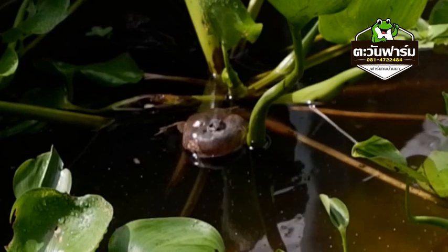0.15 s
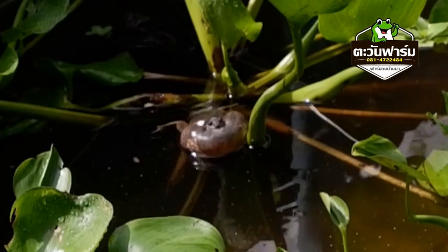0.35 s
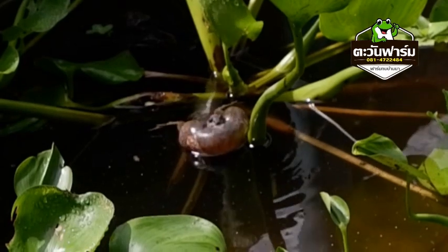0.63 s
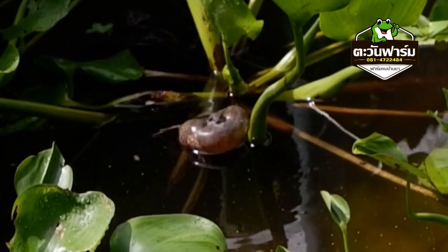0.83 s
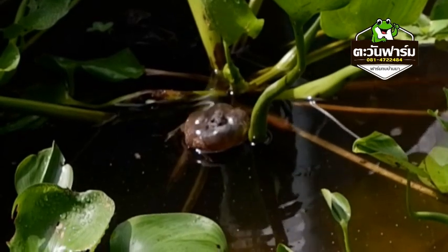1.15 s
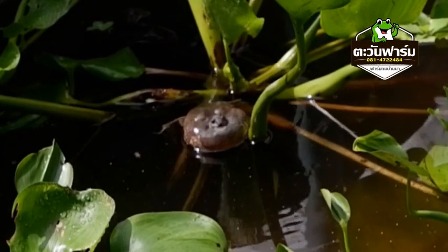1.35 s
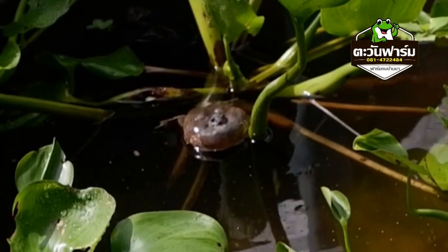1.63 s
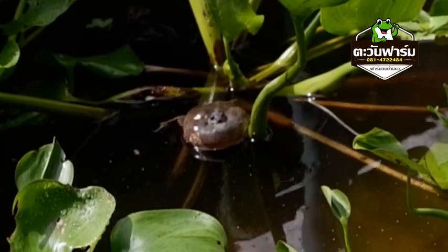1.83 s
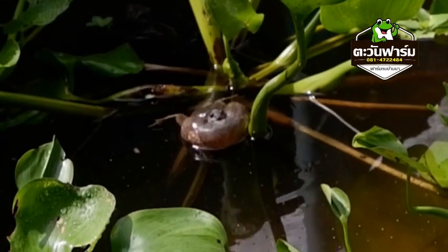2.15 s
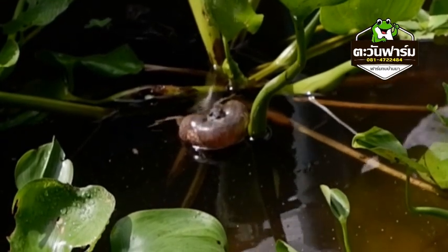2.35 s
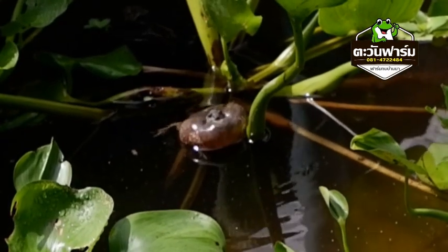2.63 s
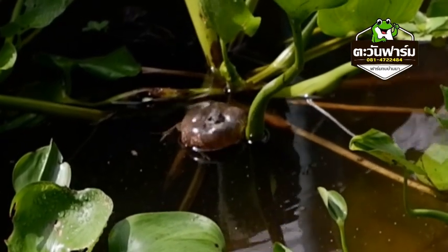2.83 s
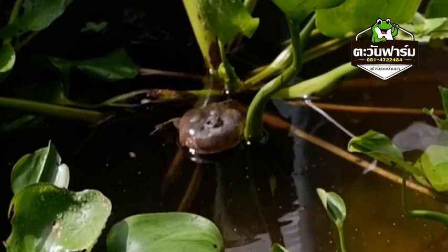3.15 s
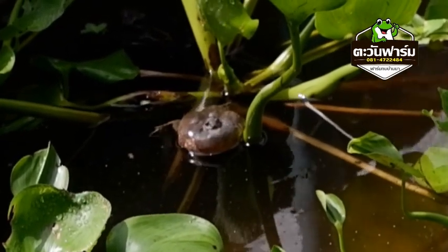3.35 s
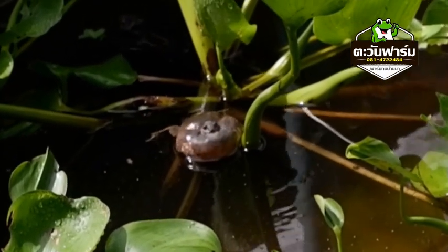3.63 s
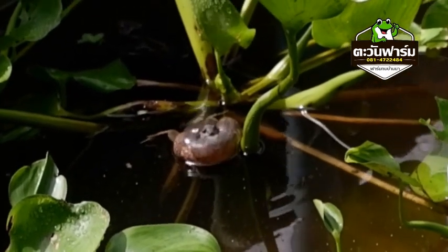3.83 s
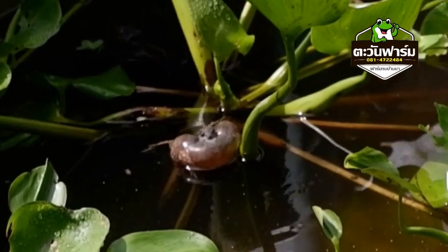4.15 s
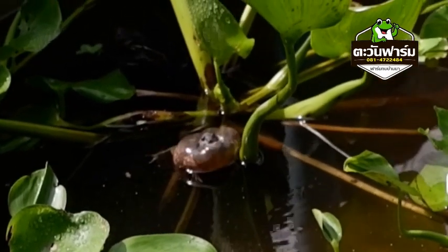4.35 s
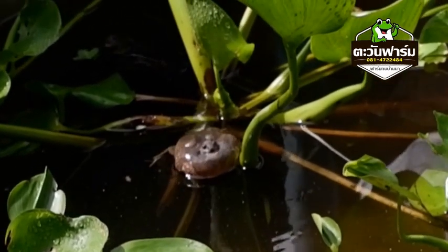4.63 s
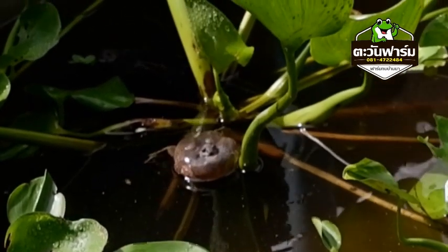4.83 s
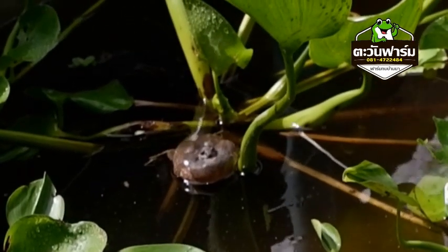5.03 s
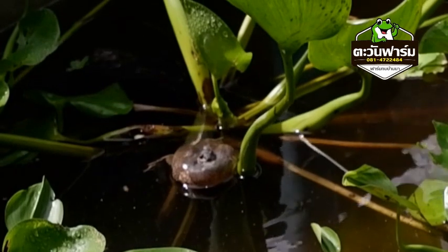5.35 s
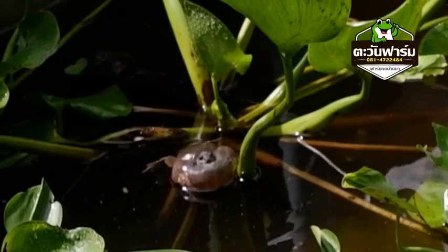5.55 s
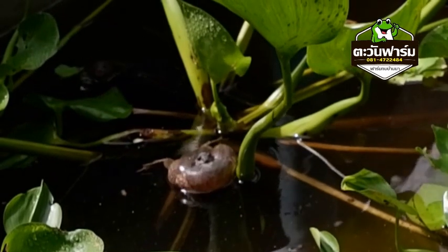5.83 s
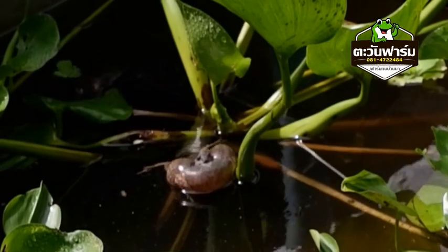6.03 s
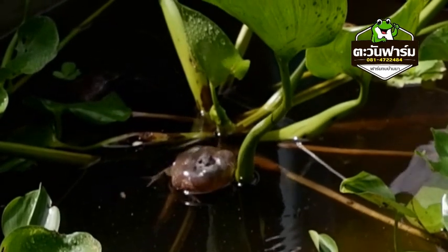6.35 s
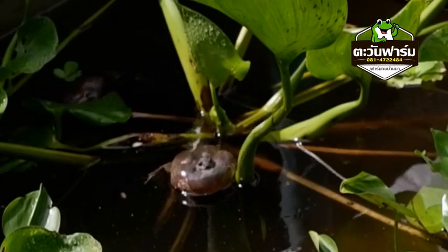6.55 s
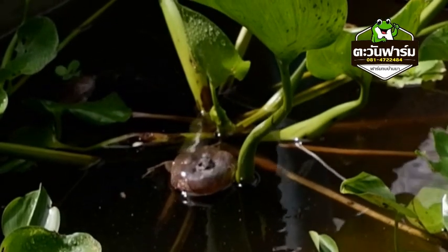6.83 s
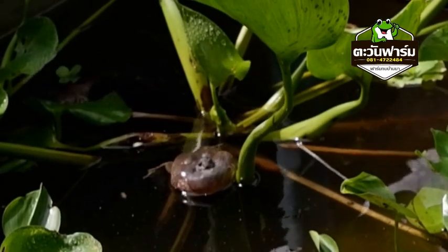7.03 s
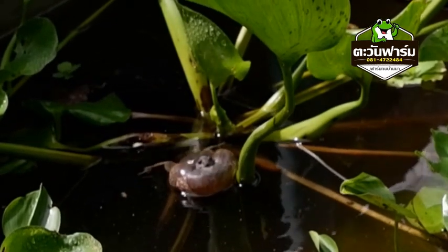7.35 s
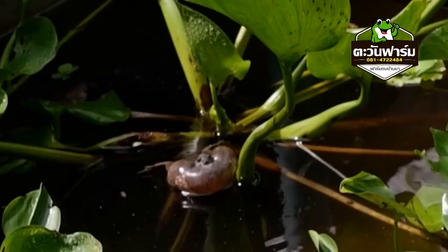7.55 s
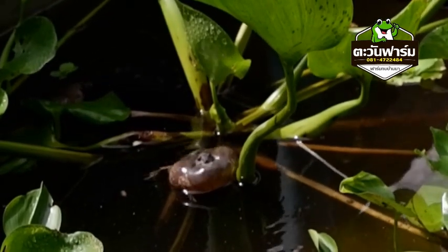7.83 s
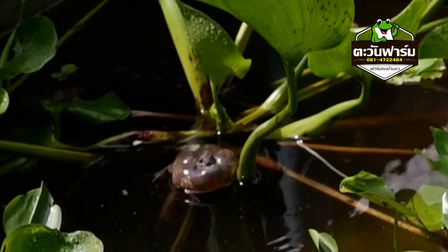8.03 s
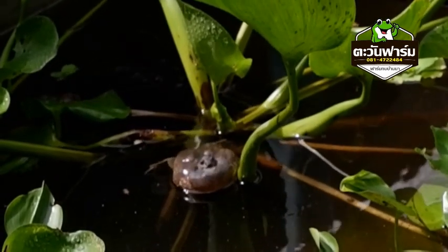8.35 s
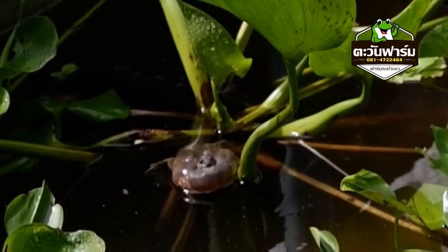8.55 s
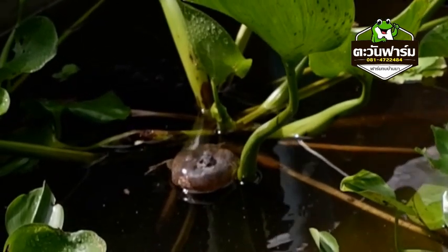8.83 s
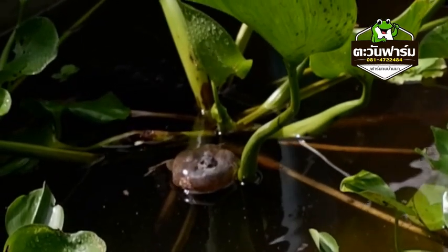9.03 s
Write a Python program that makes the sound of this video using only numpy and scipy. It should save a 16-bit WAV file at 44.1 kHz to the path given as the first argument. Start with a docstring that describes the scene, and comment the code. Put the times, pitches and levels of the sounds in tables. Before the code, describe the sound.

Close, buzzy frog calls repeat steadily over a faint rattling chorus of small frogs and softer answering croaks.

```python
"""Small frogs rattle all around a pond and a neighbour croaks from the left; then a burrowing frog,
floating close by, calls again and again, about 57 pulses a second ringing its swollen vocal sac.
Neighbours answer; a close rattle, thin squeaks, two plops and faint low rumbles fill the gaps.
A limiter ducks the chorus under the calls. Near the end the sound cuts out twice, then comes back
with a click and a low thump."""
import sys
import numpy as np
from scipy import signal
from scipy.fft import rfft, irfft, next_fast_len
from scipy.io import wavfile
from scipy.ndimage import uniform_filter1d, minimum_filter1d

SR = 44100
rng = np.random.default_rng(int(sys.argv[2]) if len(sys.argv) > 2 else 0)


def master_out(mix):
    """Clip the mix to full scale and print it as 16-bit PCM to the path in sys.argv[1]."""
    frames = np.transpose(np.atleast_2d(mix))
    ceiling = np.clip(frames, -1, 1)
    pcm = np.round(ceiling * 32767).astype(np.int16)
    wavfile.write(sys.argv[1], SR, pcm)


N = 405279
TIME = np.arange(N) / SR

# tone of the farthest frogs: (frequency [Hz], relative level [dB])
CHORUS_COLOUR = [(60, -29.5), (200, -26.5), (290, -15.5), (380, -25), (520, -15), (950, -16), (1350, -7.5),
                 (1900, -7.5), (2950, 0.5), (3500, -12.5), (4500, -26), (6500, -33), (9500, -47),
                 (15000, -51)]
# stereo image of the diffuse beds: (frequency [Hz], left-right correlation [ratio])
STEREO_LIKENESS = [(40, 0.47), (120, 0.42), (700, 1), (1400, 0.39), (2600, 0.032), (5000, 0.12)]
# surges and one lull in the chorus: (middle [s], length [s], level change [dB])
CHORUS_SWELLS = [(1.05, 0.6, 1.5), (2.919, 0.42, 1), (5.55, 0.18, 2), (6.901, 0.85, -2.5), (7.52, 0.66, 2)]
# tone of the low rumble: (frequency [Hz], relative level [dB])
RUMBLE_COLOUR = [(20, 1.5), (70, 3), (150, -19), (300, -24.5), (800, -45)]
# faint puffs of air, and last a low thump as the sound cuts back in: (middle [s], length [s], level [dB])
LOW_RUMBLES = [(2.1, 0.81, -59), (2.9, 0.38, -66), (5.7, 0.78, -75.5), (8.661, 0.22, -56.5)]
# neighbours' calls: (first pulse [s], last pulse [s], pulse rate [1/s], relative level [dB],
# sac pitch [Hz], upper resonance [Hz], upper trim [dB])
NEIGHBOUR_CALLS = [(0.056, 0.269, 50.6, -28.5, 466, 747, 0.5), (0.712, 0.951, 50.8, -25, 495, 772, -1.5),
                   (0.997, 1.194, 61, -19.5, 544, 738, 0.5), (1.612, 1.809, 57, -18, 592, 887, -4),
                   (2.651, 2.883, 51.5, -23.5, 573, 920, -3.5), (3.439, 3.712, 57, -23, 608, 940, 4),
                   (4.54, 4.599, 112, -22.5, 663, 1000, -7), (5.174, 5.403, 59, -24, 480, 814, 1.5),
                   (5.956, 6.092, 49, -35.5, 433.7, 800, 3), (7.179, 7.408, 59.6, -28.5, 426, 934, -6.5),
                   (8.809, 8.994, 46, -20, 565, 810, -2), (9.072, 9.18, 55, -12.5, 563, 820, -3.5)]
# near frog's calls: (onset [s], flurry settles [s], last strong pulse [s], gap stretch [ratio],
# whistle trim [dB])
NEAR_CALLS = [(.2173, .2551, .588, .975, -3), (1.2711, 1.3113, 1.619, 1.012, -3),
              (2.0608, 2.0832, 2.417, .979, -2), (3.0791, 3.1078, 3.413, .989, -2),
              (3.8946, 3.9283, 4.229, 1.001, 0), (4.586, 4.621, 4.942, .961, 4),
              (5.6592, 5.6927, 6.011, .995, -2), (6.4023, 6.4261, 6.756, .965, 5),
              (7.7313, 7.7538, 8.034, 1.016, 0), (8.592, 8.5575, 8.858, .963, -2)]
# its overtones, sinking as the lungs empty: (first pitch [Hz], last pitch [Hz], width [Hz],
# first level [dB], middle level [dB], last level [dB]); levels are relative
OVERTONES = [(2313, 1720, 47, -32, -44.5, -39), (3795, 2880, 99, -27.5, -45.5, -38.5),
             (1490, 1100, 290, -28, -23, -29), (3560, 3200, 1400, -30.5, -34, -58),
             (980, 937, 222, -20, -16, -20), (103, 97, 160, -43.5, -36, -61)]
# its thin top overtones: same columns
WHISTLES = [(5700, 4650, 90, -63, -56, -61), (7250, 6750, 400, -55, -68, -67)]
# bouts of a small frog close by: (start [s], end [s], click rate [1/s], level [dB])
CLOSE_RATTLES = [(2.465, 2.72, 39, -40.5), (4.276, 4.54, 37, -38), (4.983, 5.65, 37, -36),
                 (6.078, 6.39, 31, -38.5), (7.064, 7.72, 33.3, -37)]
# squeaks from the reeds: (time [s], length [s], pitch [Hz], level [dB])
REED_SQUEAKS = [(3.688, 0.054, 3290, -46.5), (5.372, 0.063, 3164, -44.5)]
# plops in the water: (time [s], pitch [Hz], width [Hz], level [dB])
WATER_PLOPS = [(7.54, 525, 55, -42.5), (6.83, 393, 70, -41)]
# hard cuts to silence: (start [s], end [s])
DROPOUTS = [(8.519, 8.551), (8.558, 8.5905)]


def from_db(db):
    return 10 ** (np.asarray(db) / 20)


def rms_one(x):
    return x / np.sqrt(np.mean(x ** 2) + 1e-20)


def peak_one(x):
    return x / np.max(np.abs(x))


def impulse(size=2200):
    """One click followed by silence."""
    return np.r_[1., np.zeros(size)] + 1e-18


def resonate(x, hz, width_hz):
    """A resonance with unity gain at its peak."""
    r = np.exp(-np.pi * width_hz / SR)
    feedback = [1, -2 * r * np.cos(2 * np.pi * hz / SR), r * r]
    return signal.lfilter(np.array([1, 0, -1]) * (1 - r * r) / 2, feedback, x)


def resonate_twice(x, hz, width_hz):
    return resonate(resonate(x, hz, width_hz), hz, width_hz)


def bandpass(x, low_hz, high_hz, order=2):
    return signal.sosfilt(signal.butter(order, [low_hz, high_hz], "band", fs=SR, output="sos"), x)


def hump(middle_s, length_s):
    """A smooth swell to 1 and back, above a half for length_s."""
    return .5 ** ((2 * (TIME - middle_s) / length_s) ** 2)


def add(track, s, sound):
    """Mix a sound into a track at time s."""
    i = int(np.clip(round(s * SR), 0, N))
    track[..., i:i + sound.shape[-1]] += sound[..., :N - i]


def pan(x, left_db, lag_s):
    """Stereo from a level difference and a delay of the left side."""
    left = np.interp(TIME - lag_s, TIME, x)
    return np.array([left * from_db(left_db / 2), x * from_db(-left_db / 2)])


def wash(colour):
    """A diffuse noise bed of a given tone, narrow in the low mids and wide in the treble."""
    size = next_fast_len(N)
    log_hz = np.log(np.arange(size // 2 + 1) * SR / size + 1)
    curves = np.transpose(colour), np.transpose(STEREO_LIKENESS)
    db, alike = (np.interp(log_hz, np.log(hz), values) for hz, values in curves)
    mid, side = rfft(rng.standard_normal((2, size)))
    stereo = np.sqrt(1 + alike) * mid + np.sqrt(1 - alike) * side * [[1], [-1]]
    return rms_one(irfft(from_db(db) * stereo, size)[:, :N])


def rattle(start, end, per_s, size_ratio=1):
    """A small frog's dry click train, each click ringing a low and a high resonance."""
    clicks, times = np.zeros(N), np.arange(start, end, 1 / per_s)
    at = ((times + rng.normal(0, .0008, len(times))) * SR).astype(int)
    clicks[np.clip(at, 0, N - 1)] = from_db(rng.normal(0, 3.9, len(times)))
    click = bandpass(impulse(size=400), 1400, 3450, order=3)
    high = resonate(click, 2950 / size_ratio, 420)
    low = from_db(-.5) * resonate(click, 1420 / size_ratio, 190)
    return signal.oaconvolve(clicks, peak_one(high + low))[:N]


def chorus(count=7, rattles_db=5, blur_db=-6.5, gain_db=-44):
    """Small frogs rattle in bouts all round the pond; the farthest blur into a wash."""
    out = from_db(blur_db) * wash(CHORUS_COLOUR)
    for speed, size, side, lag, turn in rng.uniform(-.81, 1, (count, 5)):
        bouts = np.maximum(np.sin(np.pi * (TIME * (1.4 + speed / 2) + turn)), 0) ** .5
        clicks = rattle(abs(turn) / 37, N / SR, per_s=37 + 4 * speed, size_ratio=1 + .093 * size)
        out += from_db(rattles_db) * pan(clicks * bouts, left_db=6 * side, lag_s=.00037 * lag)
    swell_db = sum(db * hump(s, length) for s, length, db in CHORUS_SWELLS)
    return out * from_db(gain_db + swell_db) * from_db([[3.5], [.2]])   # leans left


def low_end(floor_db=-88.5, hum_db=-66):
    """Low rumbles: faint puffs of air and a thump as the sound cuts back in; a late hum comes and goes."""
    level = from_db(floor_db) + sum(from_db(db) * hump(s, length) for s, length, db in LOW_RUMBLES)
    hum = rms_one(resonate_twice(rng.standard_normal(N), hz=70, width_hz=12))
    return level * wash(RUMBLE_COLOUR) + from_db(hum_db) * hump(middle_s=7.75, length_s=.9) * hum


def neighbours(crest=.81, glide=.11):
    """Farther frogs ring their sacs with uneven pulses that rise in pitch, swell and fade."""
    low, high = np.zeros((2, N))
    click = bandpass(impulse(), 468, 1300, order=3)
    thud = from_db(-26) * peak_one(resonate_twice(impulse(), hz=230, width_hz=240))
    for first, last, per_s, db, sac_hz, upper_hz, upper_db in NEIGHBOUR_CALLS:
        for done in np.linspace(0, 1, round((last - first) * per_s) + 1):
            s = first + (last - first) * done + rng.normal(0, .0012)
            gain = from_db(db + np.interp(done, [0, crest, 1], [-3, 0, -8]) + rng.normal(0, 1.3))
            double = .64 * max(1 - done / crest, 0)   # a second hit, gone by the call's crest
            for delay, share in [(0, 1), (rng.uniform(.004, .00762), double)]:
                sac_bend, upper_bend = 1 + glide * (done - .5) + rng.normal(0, .016, 2)
                sac = peak_one(resonate(click, sac_hz * sac_bend, width_hz=68))
                upper = peak_one(resonate(click, upper_hz * upper_bend, width_hz=100))
                add(low, s + delay, share * gain * (sac + thud))
                add(high, s + delay, -share * gain * from_db(upper_db) * upper)
    low = from_db(-7) * pan(low, left_db=6, lag_s=.000071)
    high = from_db(-9) * pan(high, left_db=16, lag_s=.00015)
    return bank_reflections(low + high)


def bank_reflections(x, wet_db=-12, t60_s=.12, size=3000):
    """Short scattered reflections from leaves and banks, different on each side."""
    t = np.arange(size) / SR
    tail = rng.standard_normal((2, size)) * from_db(-60 * t / t60_s) * (t > .003)
    tail /= np.sqrt(np.sum(tail[0] ** 2))
    return x + from_db(wet_db) * signal.oaconvolve(x, tail, axes=1)[:, :N]


def larynx_times(onset, settle, end, stretch, flurry_gap_s=.011, base_gap_s=.01645, growth_s=.00017):
    """A quick flurry, a beat that wobbles and slowly widens, then a hurry as the pressure runs out."""
    flurry = max(round((settle - onset) / flurry_gap_s), 1)
    times = list(onset + (settle - onset) * np.linspace(0, 1, flurry + 1) ** 1.2)
    beat = 0
    while times[-1] < end + .012:
        # the larynx lags, overshoots and steadies within a few pulses
        wobble_s = .00817 * np.exp(-beat / 1.45) * np.cos(2 * np.pi * (beat - .644) / 3.93)
        hurry = 1 - .55 * np.exp(-max(end - times[-1], 0) / .03)
        times.append(times[-1] + (base_gap_s + growth_s * beat + wobble_s) * stretch * hurry)
        beat += 1
    times = np.array(times[flurry if settle < onset else 0:])   # settling before onset skips the flurry
    times = times[times >= onset]
    return times + rng.normal(0, .0003, len(times))


def push_db(done, lead_in_db=-34.5, accent_db=2.5):
    """Push on the sac as a call runs from 0 to 1: soft lead-in, hard attack, arch, quick release."""
    if done < -.005:
        return lead_in_db
    arch_db = 29 * (done - .38) ** 2
    release_db = 91 * max(done - .92, 0)
    return accent_db * (done < .01) - arch_db - release_db


def sac_pulse(done, throat_hz=525, throat_rise_hz=150, sac_hz=798):
    """A pulse rings the throat and the sac in series; their beat gives it a second hump."""
    throat = resonate(impulse(), throat_hz + throat_rise_hz * done, width_hz=120)
    sac = resonate(throat, sac_hz * (1 + rng.normal(0, .005)), width_hz=66)
    skin = bandpass(sac, 480, 918)
    return peak_one(skin) * from_db(push_db(done) + rng.normal(0, .94))


def overtone(row, done, sag=1.6, rise_s=.0014, size=2201):
    """One overtone of one pulse: it builds for a moment, then dies away."""
    first_hz, last_hz, width_hz, *dbs = row
    t = np.arange(size) / SR
    hz = first_hz + (last_hz - first_hz) * (1 - np.exp(-sag * done)) / (1 - np.exp(-sag))
    db = np.interp(done, [-.005, 0, .5, 1, 1.1], [-90, *dbs, dbs[-1] - 14]) + rng.normal(0, 2)
    envelope = (1 - np.exp(-(t / rise_s) ** 2)) * np.exp(-np.pi * width_hz * t)
    detune = 1 + rng.normal(0, .004)
    return from_db(db) * peak_one(envelope) * np.sin(2 * np.pi * hz * detune * t)


def rasp(age_s, start_db=-36, fade_db_per_s=200):
    """The larynx bursts open with a bright rasp that fades over the first pulses."""
    burst = rng.standard_normal(600) * signal.windows.hann(1200)[600:]
    return from_db(start_db - fade_db_per_s * age_s) * peak_one(bandpass(burst, 3000, 5200))


def near_frog(gain_db=.5, lead_s=.022):
    """The lead voice: each larynx pulse rings the sac, its overtones and a thin whistle on top."""
    out = np.zeros(N)
    for onset, settle, end, stretch, whistle_db in NEAR_CALLS:
        lead_in = onset - lead_s * rng.uniform([.9, .3], [1.4, .6])   # two soft pulses as the larynx opens
        for s in np.r_[lead_in, larynx_times(onset, settle, end, stretch)]:
            done = (s - onset) / (end - onset)
            pulse = sac_pulse(done)
            pulse -= sum(overtone(row, done) for row in OVERTONES)   # they swing against the sac
            pulse += from_db(whistle_db) * sum(overtone(row, done) for row in WHISTLES)
            add(out, s, from_db(gain_db) * pulse)
            if settle > onset and done > -.005:
                add(out, s, rasp(s - onset))
    return pan(out, left_db=-2.5, lag_s=.000045)


def limiter(x, ceiling_db=-11.7, fast_db_per_s=110, slow_db_per_s=13, slow_share=.54, size=110):
    """The gain ducks just ahead of each peak, recovers part of the way quickly and the rest slowly."""
    over_db = np.maximum(20 * np.log10(np.abs(x).max(axis=0) + 1e-9) - ceiling_db, 0)
    fast = np.maximum.accumulate(over_db + fast_db_per_s * TIME) - fast_db_per_s * TIME
    slow = np.maximum.accumulate(slow_share * over_db + slow_db_per_s * TIME) - slow_db_per_s * TIME
    held_db = minimum_filter1d(-np.maximum(fast, slow), 2 * size)
    return x * from_db(uniform_filter1d(held_db, size))


def close_rattler():
    """One small frog clicks in short bouts, close and near the centre."""
    bouts = sum(from_db(db) * rattle(start, end, per_s) for start, end, per_s, db in CLOSE_RATTLES)
    return pan(bouts, left_db=-1, lag_s=0)


def squeaks():
    """Thin squeaks from the reeds on the left: soft-edged bursts of narrow noise."""
    out = np.zeros(N)
    for s, length, hz, db in REED_SQUEAKS:
        size = int(length * SR)
        noise = rms_one(resonate_twice(rng.standard_normal(size), hz, width_hz=500))
        add(out, s, from_db(db) * signal.windows.tukey(size) * noise)
    return pan(out, left_db=10, lag_s=.0001)


def plops():
    """The water plops on the left: a short low ring with a rounded attack."""
    out = np.zeros(N)
    for s, hz, width_hz, db in WATER_PLOPS:
        ring = resonate(impulse(), hz, width_hz)
        add(out, s, from_db(db) * peak_one(resonate(ring, hz, width_hz=336)))
    return pan(out, left_db=10, lag_s=.0001)


def cut_out(x, click_db=-26):
    """The sound drops to silence twice and returns from the second gap with a click."""
    for start, end in DROPOUTS:
        x = x * ((TIME < start) | (TIME > end))
    click = from_db(click_db) * signal.lfilter([1], [1, -.85], impulse())
    add(x, DROPOUTS[-1][1], click * from_db([[2], [-2]]))
    return x


def scene():
    """The near frog in front, the rest of the pond around it."""
    return near_frog() + neighbours() + chorus() + close_rattler() + squeaks() + plops() + low_end()


def record(dry, stopband_hz=17200):
    """The master chain: limiter, dropouts and a steep top cut."""
    top_cut = signal.cheby2(12, 70, stopband_hz, fs=SR, output="sos")
    return signal.sosfilt(top_cut, cut_out(limiter(dry)))


dry = scene()
out = record(dry)
master_out(out)
```